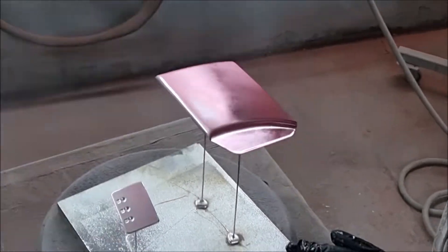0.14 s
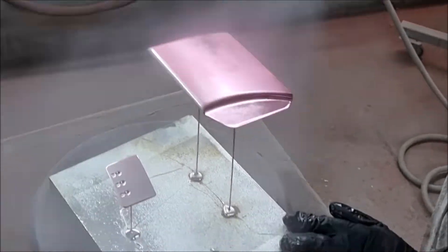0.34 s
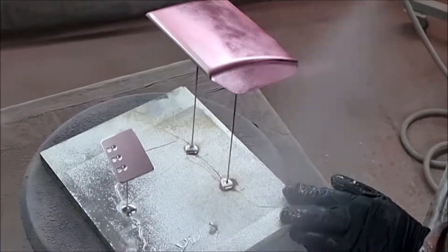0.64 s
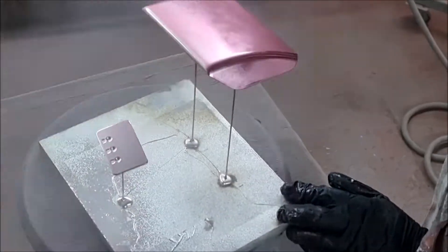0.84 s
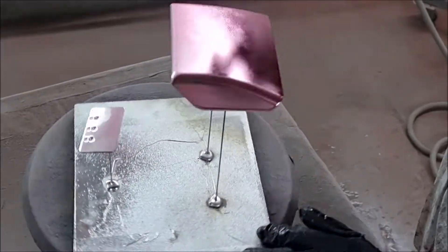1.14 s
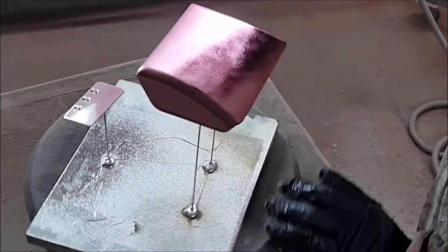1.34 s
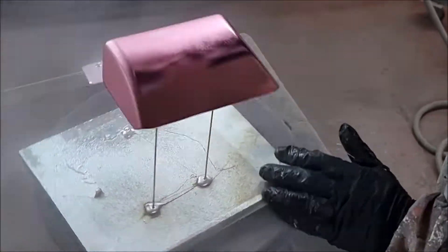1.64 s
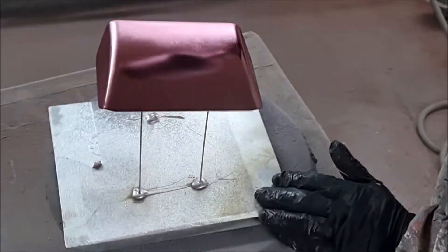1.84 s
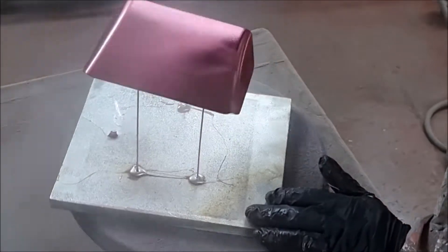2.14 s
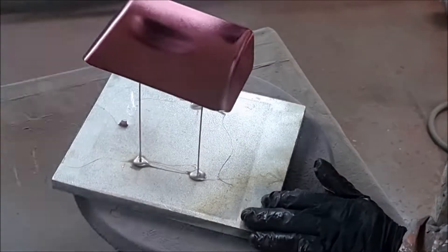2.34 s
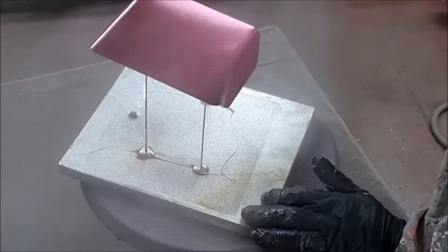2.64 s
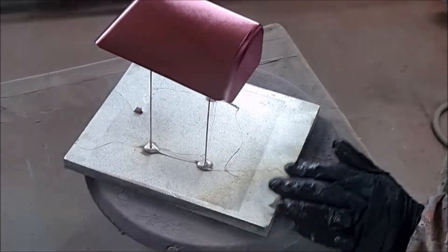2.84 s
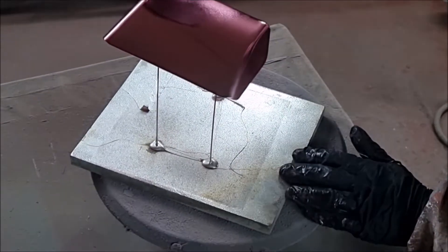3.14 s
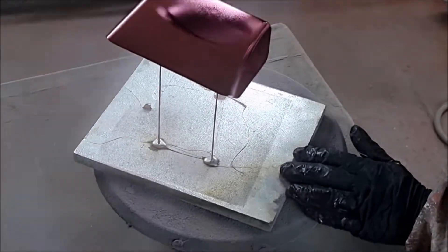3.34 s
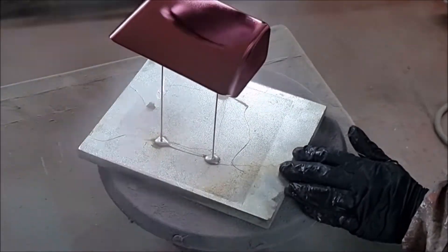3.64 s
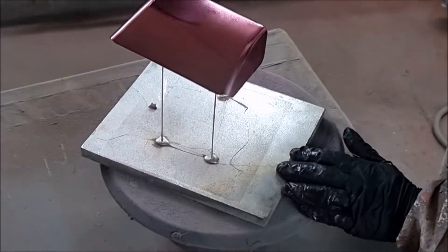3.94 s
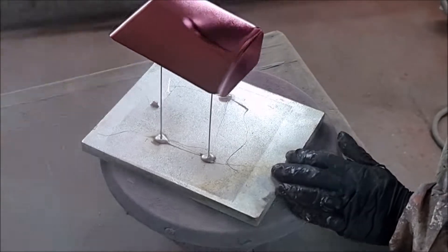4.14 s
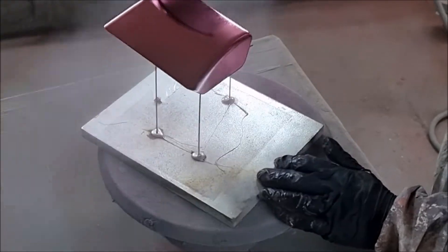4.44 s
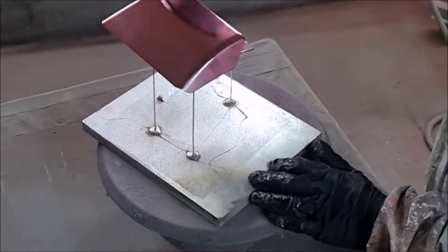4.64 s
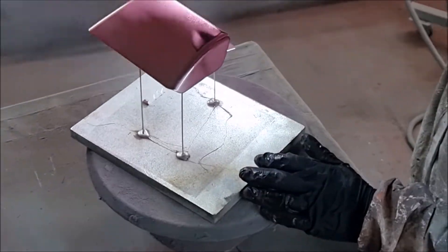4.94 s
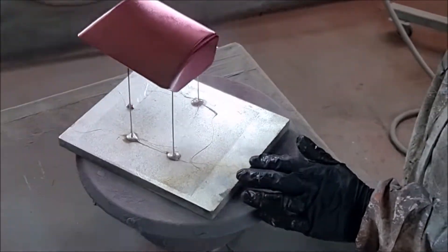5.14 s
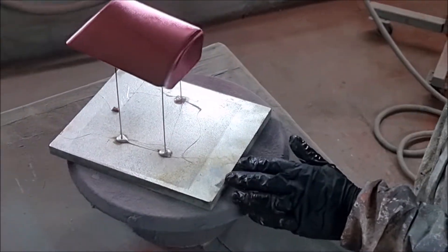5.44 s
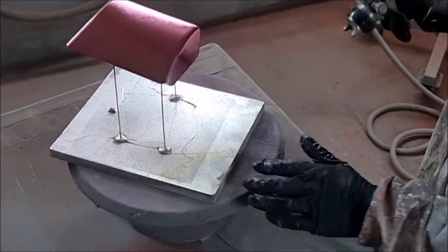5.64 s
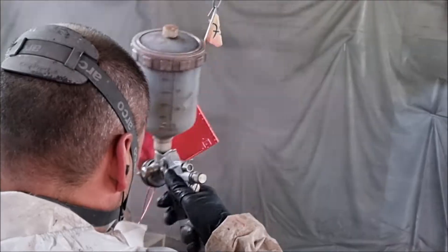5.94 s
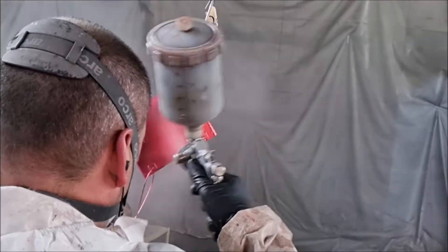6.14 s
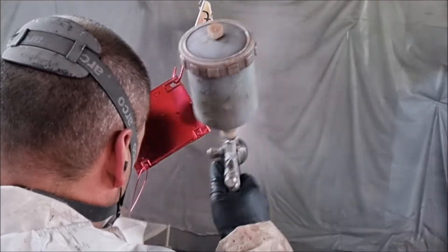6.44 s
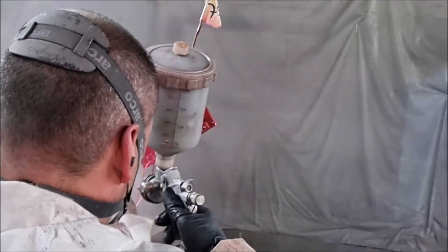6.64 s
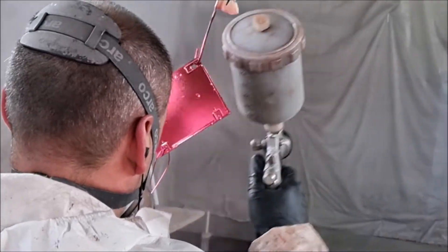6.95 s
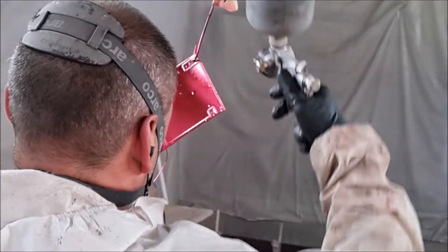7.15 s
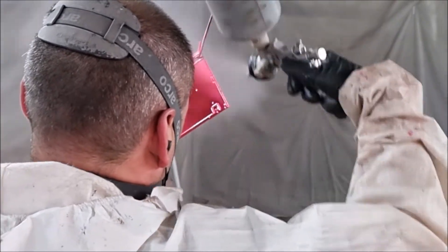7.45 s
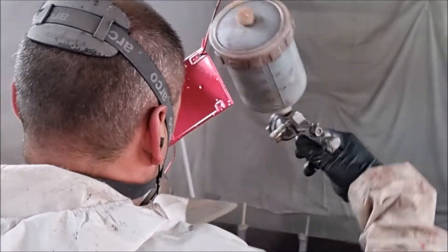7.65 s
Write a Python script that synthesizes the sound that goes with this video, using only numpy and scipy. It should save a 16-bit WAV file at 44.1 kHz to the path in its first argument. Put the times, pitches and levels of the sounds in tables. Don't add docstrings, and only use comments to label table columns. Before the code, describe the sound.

A spray gun is already hissing brightly, stops near one second, then fires a string of quick bursts separated by small gaps. A low ventilation hum and soft airy rumble continue throughout. After a pause, the view moves behind the painter, the fan grows louder, and a long blast and two shorter ones follow. Close stereo microphone, hard-walled booth with short echo.

```python
import sys
import numpy as np
from scipy import signal
from scipy.fft import rfft, irfft, next_fast_len
from scipy.io import wavfile
from scipy.ndimage import uniform_filter1d, minimum_filter1d

SR = 44100
rng = np.random.default_rng(int(sys.argv[2]) if len(sys.argv) > 2 else 0)


def wav_record(signal):
    frames = np.transpose(np.atleast_2d(signal))
    bounded = np.clip(frames, -1, 1)
    quanta = np.round(bounded * 32767).astype(np.int16)
    wavfile.write(sys.argv[1], SR, quanta)


def elevation(decibels):
    levels = np.asarray(decibels, float)
    return 10 ** (levels / 20)


N = 344421
STEP = 32
SLOW_S = np.arange(N // STEP + 2) * STEP / SR
SIZE = next_fast_len(N)
HZ = np.maximum(np.arange(SIZE // 2 + 1) * SR / SIZE, 1)
BEHIND_FROM_S = 6.0


def at_hz(points, hz, column=1):
    points = np.array(points)
    return np.interp(np.log(hz), np.log(points[:, 0]), points[:, column])


def in_time(rows):
    time_s, level_db = np.transpose(rows)
    return np.interp(SLOW_S, time_s, level_db)


def full_rate(slow):
    return np.interp(np.arange(N) / SR, SLOW_S, slow)


def bumps(middle_s, half_s, height):
    return np.exp(-.5 * ((SLOW_S[:, None] - middle_s) / half_s) ** 2) @ height


def drift(rate_hz):
    r = np.exp(-2 * np.pi * rate_hz * STEP / SR)
    settle = 2000
    slow = signal.lfilter([1], [1, -2 * r, r * r], rng.standard_normal(len(SLOW_S) + settle))[settle:]
    return slow / np.std(slow)


def stereo_noise(spectrum_db, likeness):
    mid, side = rfft(rng.standard_normal((2, SIZE)))
    alike = np.clip(at_hz(likeness, HZ), -1, 1)
    pair = np.sqrt(1 + alike) * mid + np.sqrt(1 - alike) * side * np.array([[1], [-1]])
    return pair * elevation(spectrum_db) / np.sqrt(2)


def bands(spectrum, centres_hz):
    for k in range(len(centres_hz)):
        share = np.interp(np.log(HZ), np.log(centres_hz), np.arange(len(centres_hz)) == k)
        yield irfft(spectrum * share, SIZE)[:, :N]


# open_s, shut_s, rise_ms (over 40 dB), hiss_db, body_db (air-cap body re usual)
TRIGGER = [(-.2, 0.936, 15, -46.5, 2), (1.458, 1.68, 17, -46, 1), (2.022, 2.328, 27, -46.5, 2),
           (2.427, 2.697, 15, -47, 0), (3.164, 3.447, 20, -47, 2.5), (3.532, 3.807, 18, -46, -1),
           (3.969, 4.142, 21, -46.5, 0.5), (4.316, 4.49, 19, -45.5, -2.5), (4.867, 5.053, 23, -47, 0),
           (6.092, 6.915, 0.5, -46, 0), (7.277, 7.593, 18.5, -45, 0.5), (7.741, 7.915, 22, -46.5, -3.5)]
# middle_s, half_length_s, level_db
EASES = [
    (6.326, .012, -9.5),
    (7.54, 0.021, -3),
]


def valve():
    opening = np.zeros(len(SLOW_S))
    for start, stop, rise_ms, hiss_db, _ in TRIGGER:
        since = SLOW_S - start
        up = elevation(hiss_db + np.where(since < 0, 40000 * since / rise_ms, 0))
        fall_ms = 12 if stop > BEHIND_FROM_S else 4
        down = np.clip((stop - SLOW_S) * 1000 / fall_ms + .5, 0, 1)
        opening = np.maximum(opening, up * down)
    return opening * elevation(bumps(*np.transpose(EASES)))


# middle_s, half_length_s, contact (0-1), turn_db (air cap towards the listener)
PASSES = [(0.067, 0.16, 0.73, -4), (0.336, 0.071, 0.17, 1.5), (0.599, .12, 0.27, 0), (.7, 0.025, 0.37, 1.5),
          (0.881, 0.069, 1.02, -4.5), (1.604, 0.083, 0.69, 0), (2.152, 0.059, 0.62, 0.5),
          (2.276, 0.059, 0.74, -2.5), (2.5, 0.042, 0.6, 2), (2.613, 0.042, 0.3, 2),
          (3.228, 0.095, 0.98, -2.5), (3.397, .03, 0, -0.5), (3.622, 0.032, 0.7, 0.5),
          (3.75, 0.059, 0.57, 1), (4.054, 0.026, 1, 0.5), (4.416, 0.059, 0.72, 3.5), (4.983, 0.068, .4, 3),
          (6.139, 0.093, 0.72, 4), (6.441, 0.043, 0.74, 3), (6.552, .06, .45, 4), (6.779, .06, 0.6, 3),
          (7.456, 0.13, 0.4, 1.5), (7.82, 0.031, 0.43, 12.5)]
MISS_DB = [-0.5, -2.5, -6, -12.5]
CONTACT_DB = [-2, -0.1, 9, 18.5]
FLUTTER_DB = [0.501, .6, 1.1, 2.2]
RELEASE_DB = [-3.5, -2.5, -0.3, -.6]


def aim():
    middle_s, half_s, contact, turn_db = np.transpose(PASSES)
    touch = bumps(middle_s, half_s, contact)
    moves_db = np.array([miss + add * touch + flutter * drift(8.4)
                         for miss, add, flutter in zip(MISS_DB, CONTACT_DB, FLUTTER_DB)])
    _, stop, _, _, body_db = np.transpose(TRIGGER)
    pull = np.searchsorted(stop[:-1], SLOW_S - .03)
    moves_db[1] += body_db[pull] + bumps(middle_s, half_s, turn_db)
    release = bumps(stop, 0.033, np.ones(len(stop)))
    return moves_db + np.outer(RELEASE_DB, release)


JET_HZ = [12500, 5190, 1600, 437]
# freq_hz, density_db (per Hz)
SPRAY = [(470, -43), (800, -12.5), (1490, -12.5), (2080, -11), (2300, -12.5), (4890, -7), (9320, -6),
         (11100, -4.5), (13400, 2.5), (15500, -2.5)]
# freq_hz, density_db (per Hz)
ROAR = [(20, -13), (40, -10), (70, -9), (150, 0.5), (250, 2.5), (400, 0.5), (800, -3)]
# freq_hz, likeness (left to right, 0-1)
SPRAY_ALIKE = [(50, 0.3), (150, 0.3), (600, 0.25), (1500, .1), (3000, .15), (6000, .05), (15000, 0)]
# freq_hz, left_minus_right_db
SPRAY_SIDE = [(60, 1.5), (130, 5), (290, -3), (640, 2), (1410, 0.5), (3100, 0.5), (6820, -0.5),
              (15000, 0.5)]
# freq_hz, t60_s, held_db (held sound re direct)
BOOTH = [(288, 0.22, 5), (1583, 0.55, -7.5), (4960, 0.46, -2.5), (10840, 0.39, -5), (14260, .37, -2)]


def spray_gun():
    moves_db = aim()
    opening, gust, out = valve(), drift(34), 0
    colour_db = np.where(HZ > 800, at_hz(SPRAY, HZ), at_hz(ROAR, HZ) - 8)
    colour_db = colour_db + at_hz(SPRAY_SIDE, HZ) * np.array([[.5], [-.5]])
    centres = np.geomspace(200, 15000, num=15)
    is_behind = SLOW_S > BEHIND_FROM_S
    for hz, noise in zip(centres, bands(stereo_noise(colour_db, SPRAY_ALIKE), centres)):
        weights = [np.interp(np.log(hz), np.log(JET_HZ[::-1]), np.arange(4) == 3 - k) for k in range(4)]
        level_db = np.dot(weights, moves_db) + .5 * gust + .6 * drift(9)
        shade_db = -1.5 * np.exp(-.5 * (np.log2(hz / 3160) / 0.2) ** 2) * is_behind
        direct = (opening * elevation(level_db + shade_db + 9.0)) ** 2
        t60_s = at_hz(BOOTH, hz) * np.array([1, 0.94])
        keeps = elevation(-120 * STEP / SR / t60_s)
        front, behind = [signal.lfilter([1 - keep], [1, -keep], direct) for keep in keeps]
        held = np.where(is_behind, behind, front) * elevation(2 * at_hz(BOOTH, hz, column=2))
        out = out + noise * full_rate(np.sqrt(direct + held))
    return out


# time_s, level_db
AIRFLOW = [(0, 6.5), (.4, -1.5), (1.4, -0.5), (3, 0), (4.9, 0.5), (5.3, 0), (5.8, 3), (6.05, 3.5),
           (6.5, 5.5), (7.2, 5.5), (7.81, 5)]
# freq_hz, density_db (per Hz)
FAN = [(8.8, -51.5), (15, -9), (79, 7), (154, -7.5), (219, -5), (253, -4.5), (348, -9), (453, -9),
       (555, -15), (2450, -33), (3480, -39), (4260, -43.5), (7500, -50), (9000, -55), (12000, -47.5),
       (15800, -50)]
FAN_HZ = [112, 458, 4280]
# freq_hz, likeness (left to right, 0-1)
FAN_ALIKE = [(30, 0.75), (80, .84), (200, 0.85), (330, 0.8), (640, 0.38), (1400, 0.1), (6000, .03),
             (15000, .03)]
# centre_hz, width_hz, level_db
DUCT = [(76, 13, 2.5), (170.5, 56, 4), (244, 12, 3), (329, 12, -1), (387, 20, -4.5), (672, 88, -5)]
# middle_s, half_length_s, level_db
RUMBLE_GUSTS = [
    (5.75, .13, 5),
    (6.85, .08, 4),
    (7.15, .08, 3),
]


def fan_air():
    lift = 1 + sum(elevation(db) / (1 + (2 * (HZ - hz) / width) ** 2) for hz, width, db in DUCT)
    parts = bands(stereo_noise(at_hz(FAN, HZ), FAN_ALIKE) * lift, FAN_HZ)
    # level in dB, and how far each follows the airflow
    far_db, follows = [-61.5, -60, -79.5], [0.53, 0.99, 1.6]
    levels_db = np.outer(follows, in_time(AIRFLOW)) + np.transpose([far_db])
    levels_db[0] += bumps(*np.transpose(RUMBLE_GUSTS))
    out = 0
    for part, level_db in zip(parts, levels_db):
        out = out + part / np.std(part) * full_rate(elevation(level_db + 0.67 * drift(2.3)))
    return out


# time_s, level_db
BLADES = [(0, -55), (.6, -59), (.87, -54.5), (1.3, -56), (1.5, -64), (1.66, -54), (2.04, -63),
          (2.22, -55.5), (3, -56), (3.24, -49.5), (3.45, -56), (3.7, -52.5), (3.9, -58.5), (4.4, -55),
          (6.02, -54), (6.1, -48), (7.2, -45), (7.81, -48.5)]
# time_s, level_db
OCTAVE = [(0, -62), (.5, -67), (3, -66.5), (4.8, -63.5), (6.02, -60.5), (6.3, -64.5), (6.8, -68.5),
          (7, -64.5), (7.81, -61.5)]


def fan_blades():
    blade_hz = 245.2
    phase = 2 * np.pi * blade_hz * np.arange(N) / SR
    tone_gain = full_rate(elevation(in_time(BLADES) + 1.3 * drift(36) + 1.2 * drift(7)))
    tone = tone_gain * np.sin(phase + full_rate(0.45 * drift(2.8)))
    octave_gain = full_rate(elevation(in_time(OCTAVE) + .8 * drift(5)))
    octave = octave_gain * np.sin(2 * phase + full_rate(.2 * drift(2.6)))
    return np.sqrt(2) * (tone * elevation([[-.3], [.3]]) + octave * elevation([[.3], [-.3]]))


# middle_s, half_length_s, level_db
RUSTLE = [
    (1.16, .004, -80),
    (5.5, .025, -86),
    (5.56, .1, -87),
    (5.77, .02, -73),
]


def rustle():
    middle_s, half_s, level_db = np.transpose(RUSTLE)
    band = signal.butter(1, [2800, 9000], "band", fs=SR, output="sos")
    noise = signal.sosfilt(band, rng.standard_normal((2, N)))
    return noise * full_rate(bumps(middle_s, half_s, elevation(level_db)))


def scene():
    return spray_gun() + fan_air() + fan_blades() + rustle()


# freq_hz, step_db (re the neighbouring lines)
CAMERA_STEP = [(550, -25), (800, -3), (1200, 2), (2300, 6), (3000, 9), (4200, 9), (6000, 7), (9000, 7),
               (15000, 1)]


def camera_rounding(x):
    frame, band_lines = 1024, 4
    n, k = np.arange(2 * frame)[:, None] + .5, np.arange(frame) + .5
    window = np.sin(np.pi * n / 2 / frame)
    basis = np.sqrt(2 / frame) * window * np.cos(np.pi / frame * (n + frame / 2) * k)
    blocks = np.pad(x, [(0, 0), (frame, 2 * frame - N % frame)]).reshape(2, -1, frame)
    lines = np.concatenate([blocks[:, :-1], blocks[:, 1:]], axis=2) @ basis
    hz = k * SR / 2 / frame
    hiss = np.std(lines[:, :, (hz > 9000) & (hz < 15000)], axis=2, keepdims=True)
    steady_hiss = minimum_filter1d(hiss, size=3, axis=1, origin=1)
    nearby = np.sqrt(uniform_filter1d(lines ** 2, size=61, axis=2) + 1e-24)
    scatter = rng.standard_normal((lines.shape[1], frame // band_lines + 1))
    scatter = uniform_filter1d(scatter, size=4, axis=0) * 2
    scatter_db = 4.3 * np.repeat(scatter, band_lines, axis=1)[:, :frame]
    step = np.minimum(nearby * elevation(at_hz(CAMERA_STEP, hz)), steady_hiss * elevation(-.5))
    step = step * elevation(scatter_db) + 1e-12
    rounded = np.sign(lines) * np.floor(np.abs(lines) / step + .4) * step
    rounded = rounded * (hz < 15740)
    frames = rounded @ basis.T
    return (frames[:, :-1, frame:] + frames[:, 1:, :frame]).reshape(2, -1)[:, :N]


def low_pass(x):
    return signal.sosfilt(signal.butter(12, 17080, fs=SR, output="sos"), x)


def record(dry):
    mix = camera_rounding(dry)
    return low_pass(mix)


dry = scene()
out = record(dry)
wav_record(out)
```